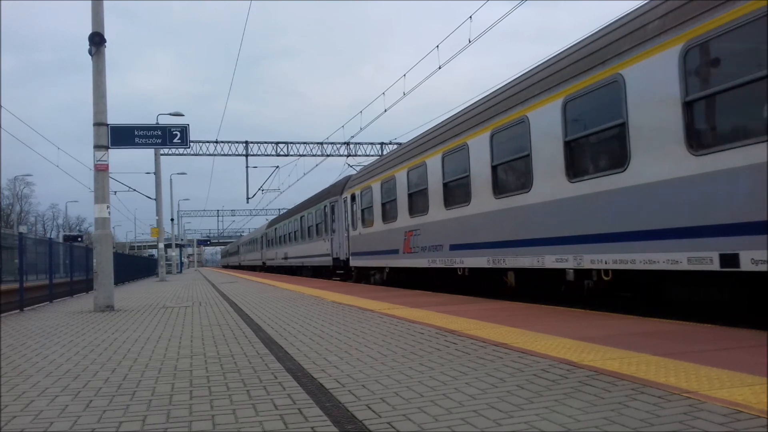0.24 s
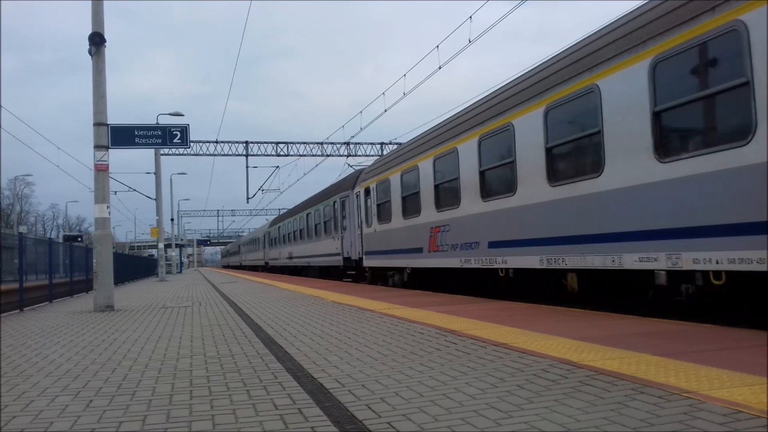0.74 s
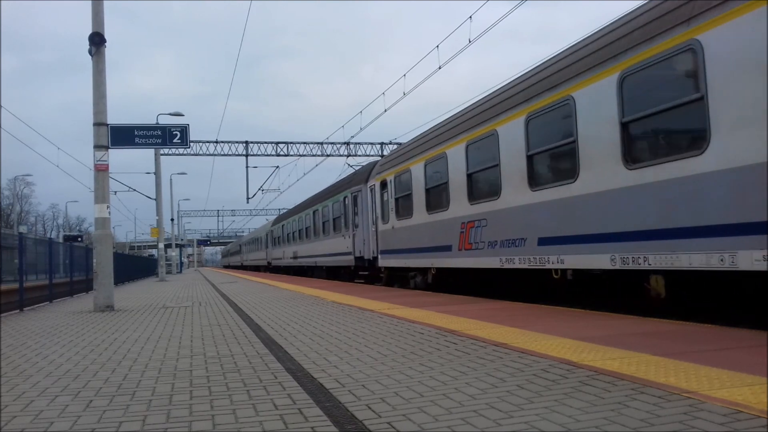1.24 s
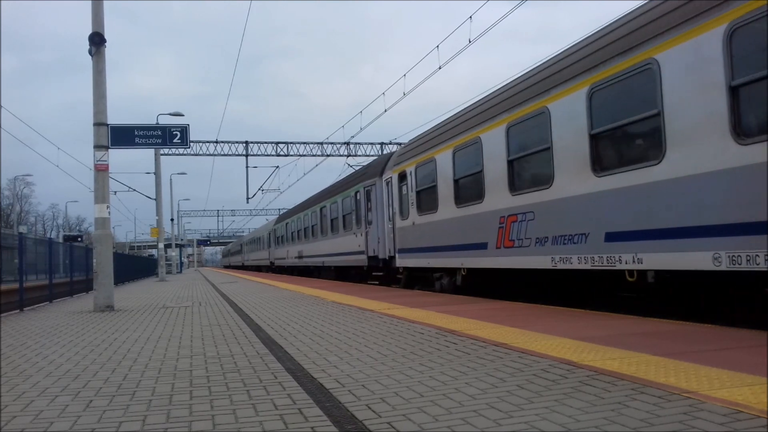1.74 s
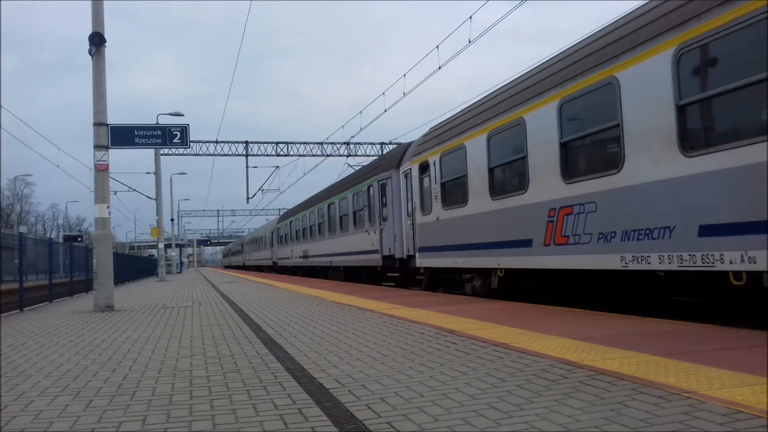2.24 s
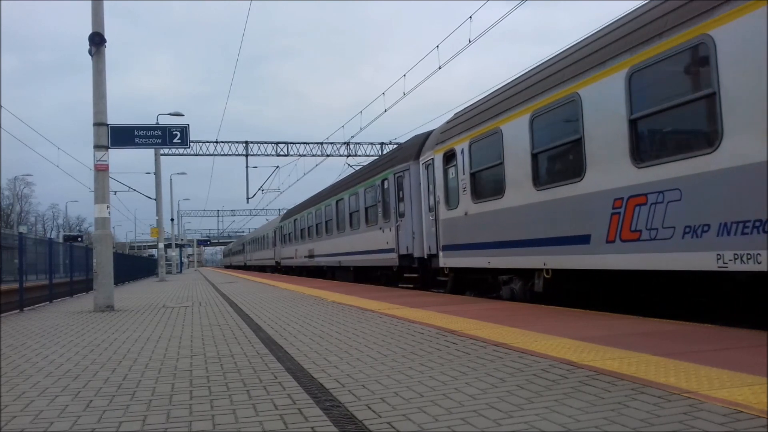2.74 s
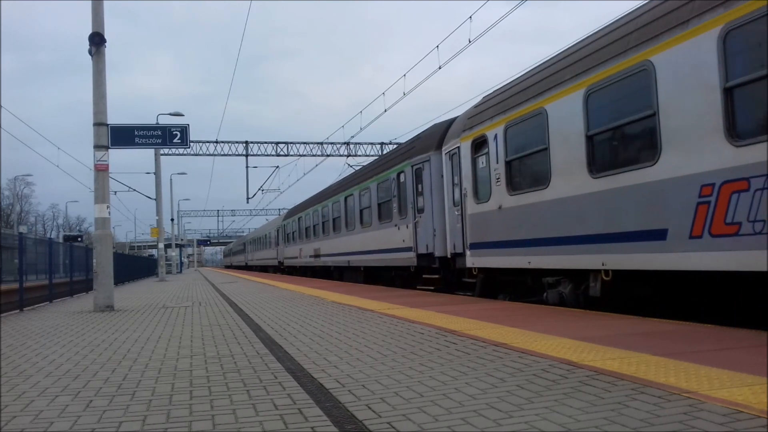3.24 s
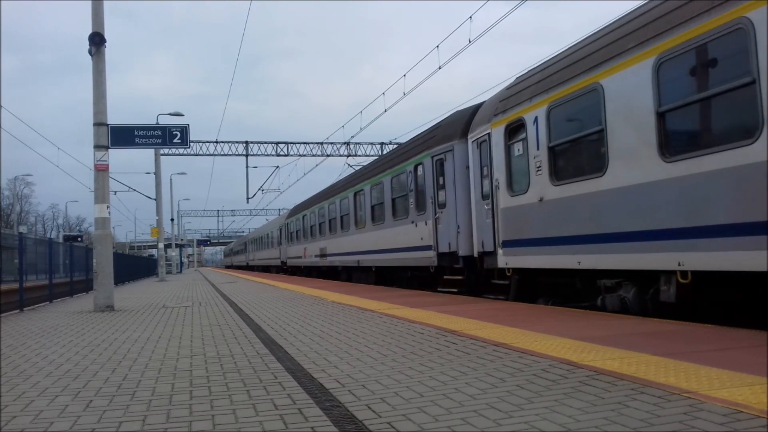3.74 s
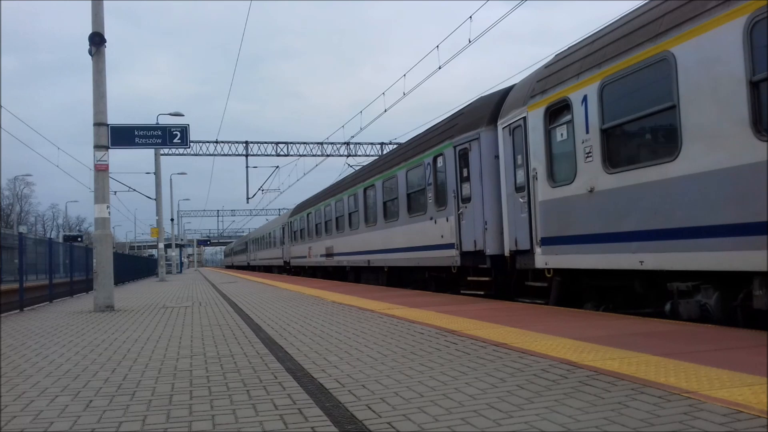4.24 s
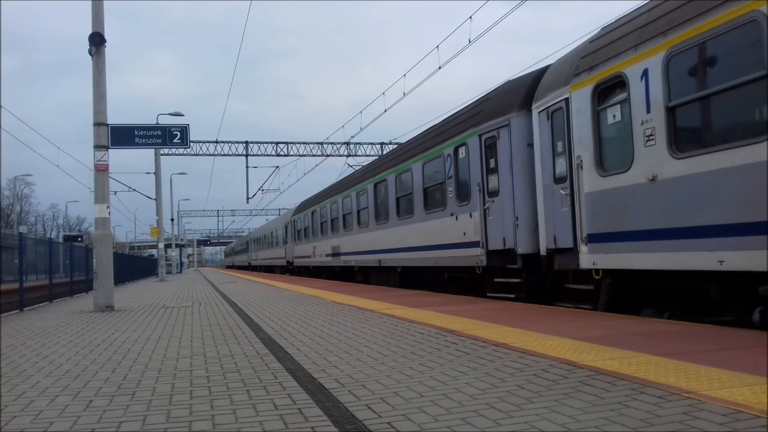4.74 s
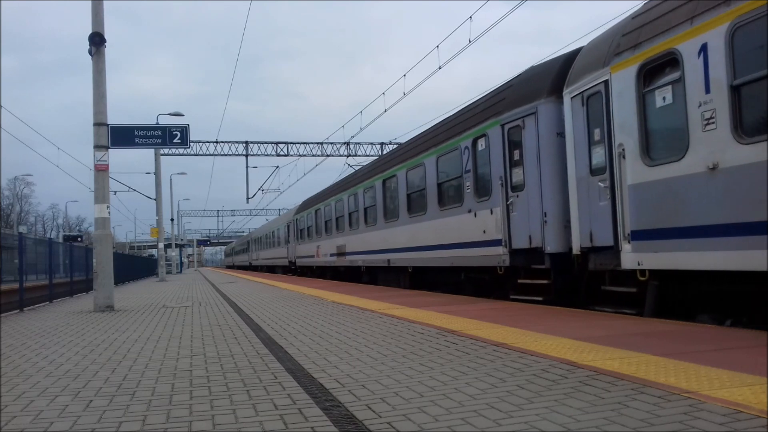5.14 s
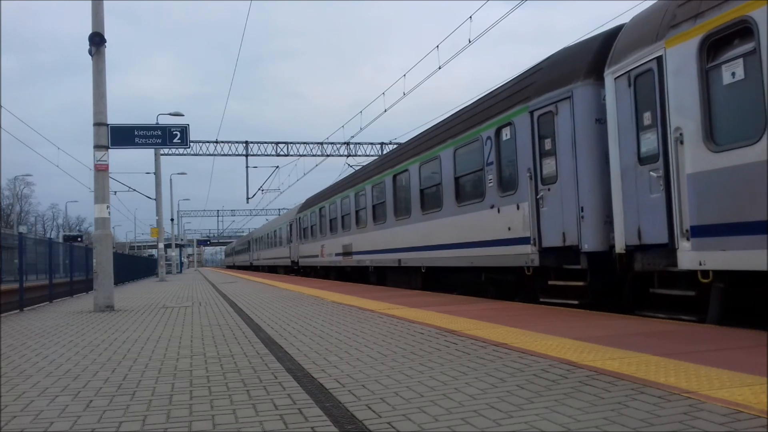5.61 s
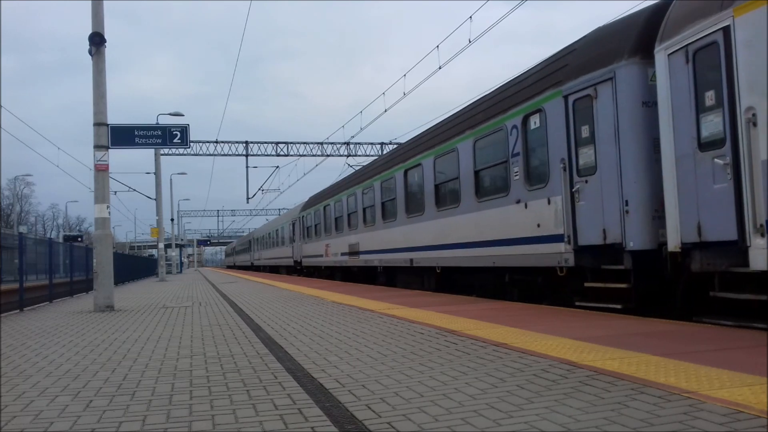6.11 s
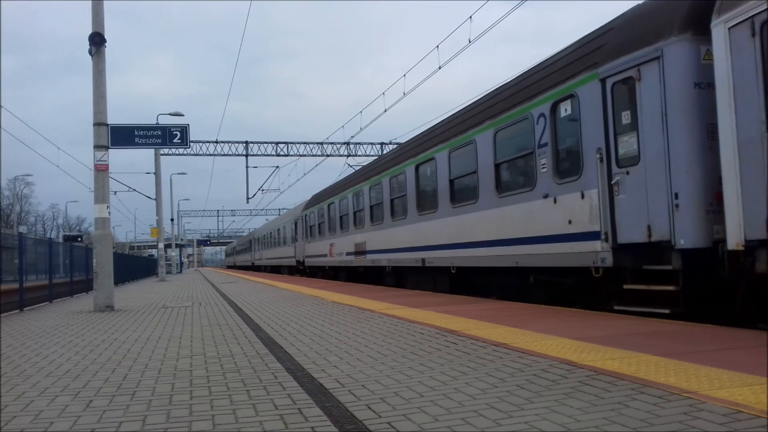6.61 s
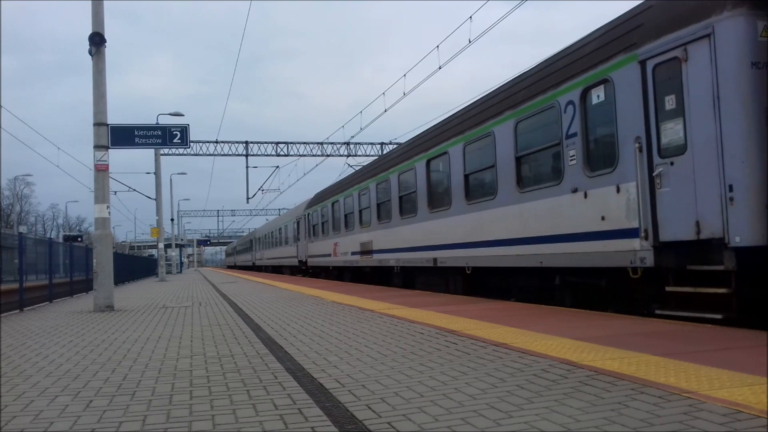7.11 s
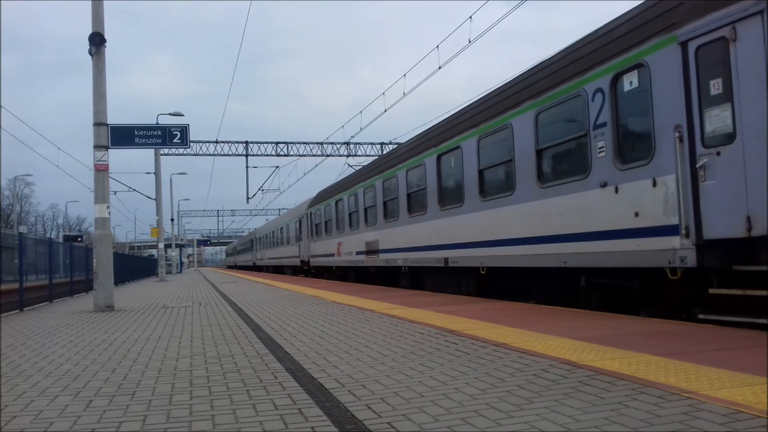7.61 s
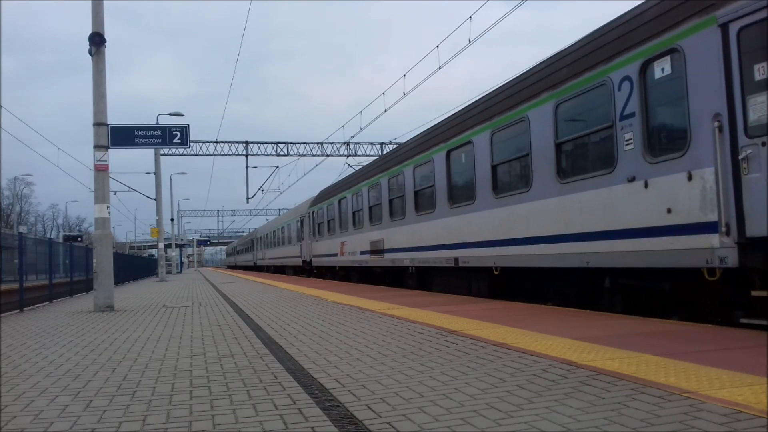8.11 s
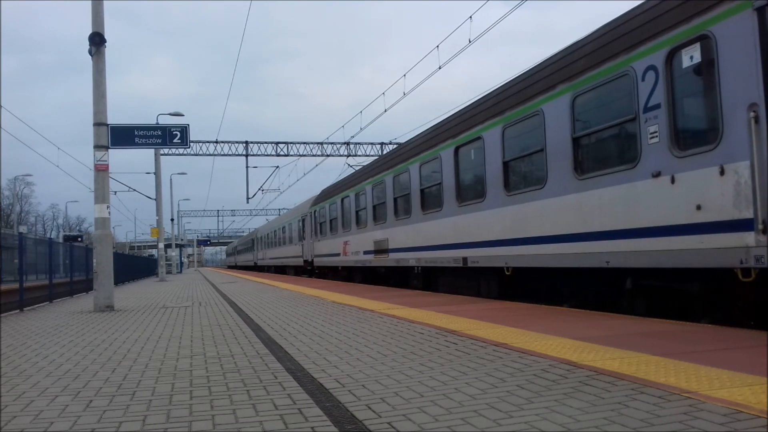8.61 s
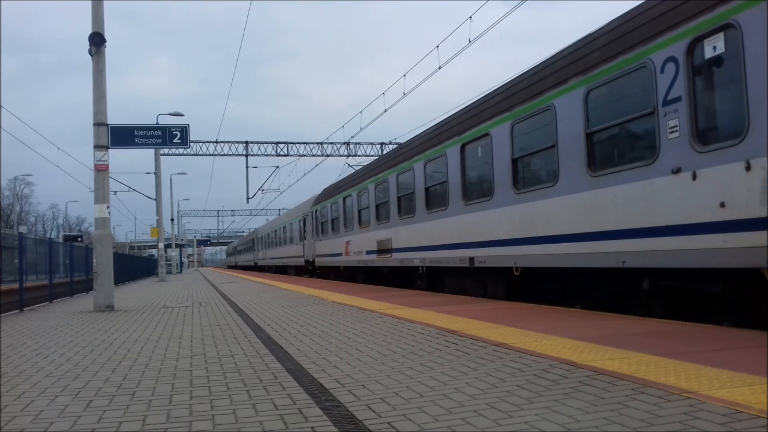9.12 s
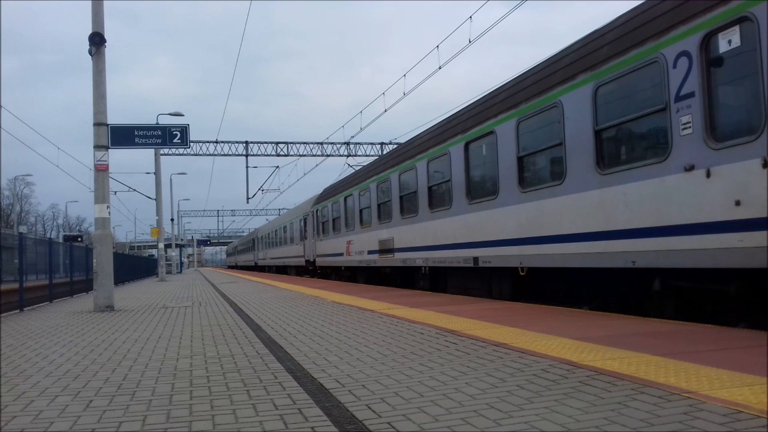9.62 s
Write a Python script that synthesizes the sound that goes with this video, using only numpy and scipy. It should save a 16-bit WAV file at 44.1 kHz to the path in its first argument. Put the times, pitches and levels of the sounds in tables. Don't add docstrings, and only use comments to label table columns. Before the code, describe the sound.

A long, shrill metallic brake squeal over soft rolling rush, dying after eight seconds into rough stuttering squeaks and groans as a passenger train almost stops.

```python
import sys
import numpy as np
from scipy import signal
from scipy.fft import rfft, irfft, next_fast_len
from scipy.io import wavfile
from scipy.ndimage import uniform_filter1d, minimum_filter1d, map_coordinates

SR = 44100
rng = np.random.default_rng(int(sys.argv[2]) if len(sys.argv) > 2 else 0)


def dump(signal):
    limited = np.clip(np.atleast_2d(signal).T, -1, 1)
    pcm = np.round(limited * 32767).astype(np.int16)
    wavfile.write(sys.argv[1], SR, pcm)


def voltage_ratio(level):
    return 10 ** (np.asarray(level, float) / 20)


N = 434826
TIME = np.arange(N) / SR

# time in seconds, level in dB.
PAD_GRIP = [(0.0, -26.5), (0.16, -31), (1.87, -29), (2.17, -32), (3.51, -33), (5.11, -31), (5.3, -32.5),
            (6.4, -32.5), (7.5, -36), (9.14, -39.5), (9.23, -37), (9.39, -41.5), (9.61, -43.5),
            (9.86, -33.5)]
GRIP_MID_DB = -33
# time in seconds, level in dB.
FAR_SQUEAL = [(0, -11.5), (1.9, -13), (3.02, -16.5), (3.46, -15.5), (3.87, -13.5), (4.37, -14.5),
              (5.43, -11), (5.79, -11.5), (6.89, -12), (7.6, -16), (8.1, -20.5), (8.62, -28), (9.23, -37),
              (9.4, -31.5), (9.86, -30.5)]
# frequency in Hz, density in dB per Hz.
SQUEAL_BAND = [(3900, -120), (4380, -43.5), (4450, -12), (4490, -1.5), (4530, 2.5), (4570, -4.5),
               (4610, -14), (4700, -38), (4800, -120)]
# start in seconds, rise in seconds, length in seconds, peak in dB,
# brightness in dB.
CREAK_BURSTS = [(7.631, 0.016, .05, -36.5, -6), (7.739, .03, 0.079, -39.5, -1), (7.86, .02, .04, -48, 8),
                (7.994, .012, .03, -41, 8), (8.044, 0.05, 0.096, -28.5, 0),
                (8.16, 0.021, 0.046, -40.5, 3.5), (8.267, .008, .052, -31, 4),
                (8.322, .032, 0.069, -24, -3), (8.524, 0.011, 0.047, -24.5, 0.5),
                (8.58, .016, 0.057, -27, -2), (8.712, 0.029, 0.061, -28, 4.5),
                (8.758, 0.015, .07, -26.5, 0), (8.877, 0.02, .055, -28, 2.5),
                (9.012, 0.0074, 0.042, -28.5, 5), (9.045, 0.045, 0.084, -28.5, 6),
                (9.134, .018, .047, -26, 3), (9.209, .074, 0.11, -31.5, 6.5), (9.353, .03, .085, -31, 8),
                (9.604, 0.02, 0.058, -28.5, 2), (9.652, 0.021, 0.16, -31.5, 7.5),
                (9.765, .015, .04, -25, 0), (9.815, .015, .05, -31, 2.5)]
GRAB_S = 8.13


def unit(x):
    return x / np.sqrt(np.mean(np.abs(x) ** 2) + 1e-20)


def curves(rows):
    s, *cols = np.transpose(rows)
    return [np.interp(TIME, s, c) for c in cols]


def gate(rows, fade):
    return np.clip(np.minimum(TIME - rows[0][0], rows[-1][0] - TIME) / fade + 1, 0, 1)


def spells(rows):
    return sum(voltage_ratio(db) * gate([(s,), (s + length_s,)], fade=.03) for s, length_s, db in rows)


def wobble(rate):
    coarse_s = TIME[::48]
    knots = rng.standard_normal(int(N * rate / SR) + 4)
    return np.repeat(map_coordinates(knots, [coarse_s * rate]), 48)[:N]


def coloured(x, spectrum):
    m = next_fast_len(len(x) + 8192)
    hz, db = np.transpose(spectrum)
    bins_hz = np.fft.rfftfreq(m, 1 / SR)
    gain_db = np.interp(np.log(bins_hz + 1), np.log(hz + 1), db)
    return irfft(rfft(x, m) * voltage_ratio(gain_db), m)[:len(x)]


def ringing(x, modes):
    m = next_fast_len(N + 8192)
    f = np.fft.rfftfreq(m, 1 / SR)
    response = sum(voltage_ratio(db) * 1j * f * w / (c * c - f * f + 1j * f * w) for c, w, db in modes)
    return irfft(rfft(x, m) * response, m)[:N]


def rush(spectrum, patchy_db=0, size=(3, 4)):
    x = rng.standard_normal(N)
    if patchy_db:
        z = signal.stft(x, nperseg=1024)[2]
        field = uniform_filter1d(rng.standard_normal(z.shape), size=size[0], axis=0)
        field = uniform_filter1d(field, size=size[1], axis=1)
        x = signal.istft(z * voltage_ratio(patchy_db * unit(field)), nperseg=1024)[1][:N]
    return unit(coloured(x, spectrum))


def motion(pass_s):
    start_m_s, stop_s, track_m, sound_m_s = 3.1, 10.5, 2.8, 343
    speed_m_s = start_m_s * (1 - TIME / stop_s)
    way_m = np.cumsum(speed_m_s) / SR
    ahead_m = np.interp(pass_s, TIME, way_m) - way_m
    return 1 + speed_m_s / sound_m_s * ahead_m / np.hypot(ahead_m, track_m)


def squeal():
    # moment of passing in seconds, pitch at rest in Hz.
    wheels = [(1.0, 4530), (5.0, 4542), (1.0, 4475), (1.05, 4377), (1.0, 4542)]
    # time in seconds, level in dB.
    singing = [
        [(0, -12.5), (.17, -7), (.42, -14.5), (.68, -11.5), (1.19, -8.5), (1.53, -12.5), (1.87, -11),
         (2.04, -18.5), (2.25, -13.5), (2.55, -8.5), (2.72, -19), (2.92, -9.5), (3.4, -20), (3.91, -11),
         (4.1, -22), (5.4, -13.5), (5.8, -23.5), (6.8, -14)],
        [(3.9, -23), (4.1, -18.5), (5.1, -13.5), (6.1, -22.5), (6.5, -15.5), (7.1, -17.5), (7.6, -16.5),
         (8.5, -26.5), (9.1, -37)],
        [(8.3, -33), (8.65, -32.5), (8.95, -26.5), (9.21, -26.5), (9.6, -23.5), (9.86, -21.5)],
        [(.3, -40), (.6, -27.5), (1.05, -21), (1.2, -31), (1.35, -24), (1.65, -36), (1.8, -33.5), (2.85, -28.5),
         (3.0, -47)],
        [(5.8, -13.5), (6.2, -22.5), (6.5, -18), (7.0, -13.5), (7.2, -23.5), (7.4, -14)],
    ]
    # multiple, level in dB.
    overtones = [(2, 3.5), (3, -13.5)]
    grip_db, far_db = curves(PAD_GRIP)[0], curves(FAR_SQUEAL)[0]
    over_db = -53 + 0.82 * (grip_db - GRIP_MID_DB) + 0.55 * (far_db - FAR_SQUEAL[0][1])
    tone = voltage_ratio(far_db - 1.5) * rush(SQUEAL_BAND)
    swings = np.zeros((len(overtones), N))
    for (pass_s, rest_hz), rows in zip(wheels, singing):
        hz = rest_hz * motion(pass_s) + 1.594 * wobble(12) + 7 * wobble(40)
        phase = 2 * np.pi * np.cumsum(hz) / SR
        level = np.sqrt(2) * voltage_ratio(curves(rows)[0]) * gate(rows, fade=0.069)
        flicker_db = uniform_filter1d(0.58 + 1.0 * wobble(22), size=64)
        tone = tone + level * voltage_ratio(flicker_db) * np.sin(phase)
        swings = swings + [np.sqrt(level) * np.sin(k * phase) for k, db in overtones]
    for (k, db), swing in zip(overtones, swings):
        far = rush([(k * hz, level_db) for hz, level_db in SQUEAL_BAND])
        tone = tone + voltage_ratio(over_db + db) * (swing * voltage_ratio(2.5 * wobble(30)) + 0.79 * far)
    return tone


def rim_hiss():
    # frequency in Hz, density in dB per Hz.
    hiss_band = [(2400, -120), (2900, -32), (3500, -16), (3900, -5.5), (4250, 0.5), (4450, 3), (4650, -1.5),
                 (4800, -8), (4950, -13.5), (5900, -26), (6900, -28.5), (7500, -33), (9000, -29.5),
                 (9700, -46.5)]
    # frequency in Hz, width in Hz, level in dB.
    rim_modes = [(5400, 90, -22.5), (6840, 160, -25), (7900, 60, -29.5), (8160, 45, -32), (8505, 30, -29.5),
                 (10650, 70, -37.5), (11300, 250, -40), (12560, 60, -42), (13930, 60, -46)]
    nearly_white = rush([(1, 0), (20000, 0.0082)], patchy_db=4, size=(12, 30))
    hiss = rush(hiss_band, patchy_db=3.0) + voltage_ratio(-7) * ringing(nearly_white, rim_modes)
    return voltage_ratio(curves(PAD_GRIP)[0] + 6.0) * hiss


def rolling():
    # time in seconds, level in dB.
    roll = [(0.0, -51), (0.74, -52), (1.51, -55), (1.81, -53.5), (3.54, -54), (4.69, -49.5), (5.25, -51.5),
            (6.37, -50.5), (6.86, -52.5), (7.69, -51.5), (8.24, -47), (9.86, -49)]
    # frequency in Hz, density in dB per Hz.
    rumble_band = [(15, -47), (40, -17), (65, -11.5), (95, -5.5), (130, -5.5), (200, -0.5), (330, -4),
                   (450, -5), (600, -31), (900, -120)]
    rail_hum_band = [(40, -120), (62, -10.5), (95, -1.5), (130, -7), (190, -120)]
    pad_band = [(240, -45), (400, -13.5), (834, -11), (1050, -10.5), (1270, -11), (1540, -10), (1950, -10),
                (2990, -11), (3700, -11.5), (4810, -32), (8140, -120)]
    fizz_band = [(8000, -120), (9300, -4), (9700, -13), (10100, -18.5), (10700, -14), (11400, -11.5),
                 (12200, -18), (13500, -15), (14500, -21), (15600, -26)]
    roll_db, grip_db = curves(roll)[0], curves(PAD_GRIP)[0] - GRIP_MID_DB
    shudder = wobble(7)
    rumble = voltage_ratio(roll_db + 1 + 2.3 * wobble(3.7)) * rush(rumble_band)
    hum = voltage_ratio(-53.5 - 1.05 * TIME + 1.2 * wobble(4)) * rush(rail_hum_band)
    pads = voltage_ratio(roll_db + 14 + 0.2 * grip_db + 1.5 * shudder) * rush(pad_band, patchy_db=2.0)
    fizz_db = -64 + 1.6 * grip_db + 1.4 * shudder + 1.5 * wobble(25)
    return rumble + hum + pads + voltage_ratio(fizz_db) * rush(fizz_band, patchy_db=3, size=(16, 20))


def halved_squeal():
    # start in seconds, length in seconds, level in dB.
    halved = [(0.855, 0.034, -45), (1.727, 0.039, -41), (2.422, 0.045, -44.5), (2.67, 0.345, -44.5),
              (3.332, 0.022, -43.5), (3.637, .03, -46), (3.77, 0.036, -39.5), (4.03, .05, -45),
              (4.214, 0.019, -39), (4.5, 0.28, -44.5), (4.895, .5, -38.5), (5.245, 0.023, -34),
              (5.51, 0.036, -39.5), (5.63, .76, -38.5), (6.45, .4, -33), (6.9, .32, -37.5),
              (7.777, 0.029, -42), (7.867, .04, -48)]
    # frequency in Hz, density in dB per Hz.
    half_band = [(1900, -120), (2130, -22), (2225, -5), (2262, 0), (2300, -6), (2400, -24), (2700, -120)]
    level = (spells(halved) + voltage_ratio(-62)) * voltage_ratio(1.5 * wobble(45))
    third = voltage_ratio(-16.5) * rush([(3 * hz, db) for hz, db in half_band])
    return level * (rush(half_band) + third)


def grabbing(fade):
    bursts = [gate([(s,), (s + length_s,)], fade) for s, rise_s, length_s, *rest in CREAK_BURSTS]
    return sum(bursts).clip(0, 1)


def groan():
    # frequency in Hz, density in dB per Hz.
    frame_band = [(300, -120), (520, -18), (590, -7.5), (640, 2.5), (720, -4.5), (820, -11.5), (1300, -120)]
    drag_band = [(350, -120), (480, -14.5), (530, -2), (560, 5.5), (590, -3), (640, -27.5), (900, -120)]
    since_s = TIME - GRAB_S
    frame_db = -38 + np.minimum(8.5 * since_s, -1 * since_s)
    drag_db = -43.5 + 6 * since_s - 10.5 * (1 - grabbing(fade=.03))
    frame = voltage_ratio(frame_db + 2.2 * wobble(14)) * rush(frame_band)
    return frame + voltage_ratio(drag_db + 3.0 * wobble(21)) * rush(drag_band)


def slips(hz, jitter, flicker_db, count=10):
    unsteady_hz = hz * (1 + jitter * wobble(35) + .011 * wobble(150))
    phase = 2 * np.pi * np.cumsum(unsteady_hz) / SR
    partials = [voltage_ratio(flicker_db * wobble(55)) * np.sin(k * phase + 2 * np.pi * rng.random())
                for k in range(1, count + 1)]
    return partials, phase


def creaks():
    # frequency in Hz, level in dB.
    shoe_band = [(1900, -120), (2100, 2), (2500, 0.5), (3000, 1), (3600, 1), (4200, 3), (4700, -5),
                 (5200, -120)]
    grit_band = [(2820, -32.5), (4800, -0.5), (5220, -1.5), (7740, -16.5), (8710, -22), (10100, -47),
                 (15600, -34)]
    scrape_band = [(700, -120), (900, -12), (1200, 1), (1600, 1), (2000, 0.5), (2600, -120)]
    # frequency in Hz, width in Hz, level in dB.
    shoe_modes = [(4090, 83, 3.5), (5100, 64, 0), (5480, 100, -2.5), (5790, 59, -9.5), (6870, 79, -7),
                  (7330, 54, -12.5), (8700, 120, -10), (9500, 62, -19.5), (10770, 110, -25),
                  (11500, 120, -20), (12600, 60, -21), (13950, 130, -28)]
    # start in seconds, end in seconds.
    hard_grabs = [
        (9.27, 9.34),
        (9.665, 9.75),
    ]
    swell_db, fade_db = 7.5, 10
    rows = []
    for s, rise_s, length_s, db, bright_db in CREAK_BURSTS:
        for at_s, less_db in [(0, swell_db), (min(rise_s, .9 * length_s), 0), (length_s, fade_db)]:
            rows.append((s + at_s, db - less_db, db + bright_db - less_db))
    second_db, upper_db = curves(rows)
    since_s = TIME - GRAB_S
    first_db = second_db - 12 + 4.5 * since_s
    third_db = upper_db - 11 + 5 * since_s
    on = grabbing(fade=0.0033)

    early = np.exp((CREAK_BURSTS[0][0] - TIME).clip(None, 0) / .45)
    hz = 546 + 60 * early
    hz = hz - 36 * sum(gate([(a,), (b,)], fade=0.036) for a, b in hard_grabs)
    near, phase = slips(hz, jitter=.013, flicker_db=3.5)
    far = slips((.95 + .14 * early) * hz, jitter=.03, flicker_db=4.5)[0]
    first, second, third, *upper = [a + .5 * b for a, b in zip(near, far)]

    grit = rng.standard_normal(N) * voltage_ratio(6.1 * np.cos(phase) + 1.7 * wobble(70))
    upper = unit(coloured(unit(sum(upper)) + 1.2 * unit(grit), shoe_band))
    chatter = voltage_ratio(first_db) * unit(first) + voltage_ratio(second_db) * unit(second)
    chatter = chatter + voltage_ratio(third_db) * unit(third) + voltage_ratio(upper_db) * upper
    chatter = chatter + voltage_ratio(upper_db - 8) * unit(coloured(grit, scrape_band))
    bright = unit(coloured(grit, grit_band)) + 0.73 * unit(ringing(grit, shoe_modes))
    chatter = chatter + voltage_ratio(upper_db - 10.5) * bright
    chatter = on * voltage_ratio(1.2 * wobble(40)) * chatter

    t = np.arange(SR // 4) / SR
    tail = rng.standard_normal(len(t)) * voltage_ratio(-60 * t / 0.18)
    return chatter + voltage_ratio(-7.5) * signal.fftconvolve(chatter, tail / np.linalg.norm(tail))[:N]


def whine():
    # start in seconds, length in seconds, level in dB.
    whines = [
        (7.998, .1, -39),
        (8.18, .04, -47),
        (8.26, 0.155, -39),
        (9.62, 0.16, -41),
    ]
    # frequency in Hz, width in Hz, level in dB.
    whine_mode = [(5130, 65, 0)]
    tone = ringing(ringing(rng.standard_normal(N), whine_mode), whine_mode)
    return spells(whines) * unit(tone)


def scene():
    mix = squeal() + rim_hiss() + rolling() + halved_squeal() + groan() + creaks() + whine()
    return mix[None]


def top_cut(x):
    return signal.sosfilt(signal.butter(12, 15710, fs=SR, output="sos"), x)


def record(dry):
    need = np.minimum(1, .93 / (np.abs(dry) + 1e-9))
    gain = uniform_filter1d(minimum_filter1d(need, size=441), size=441)
    return top_cut(dry * gain)


dry = scene()
out = record(dry)
dump(out)
```